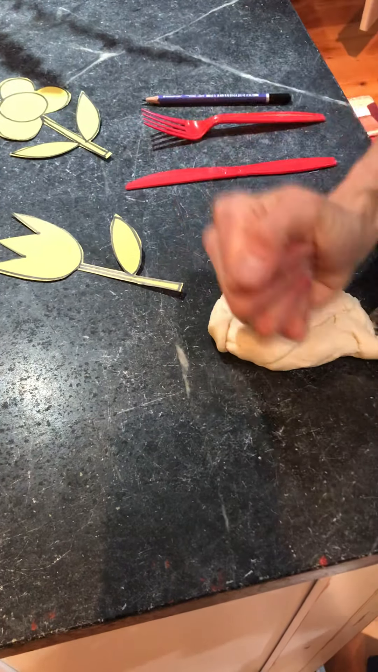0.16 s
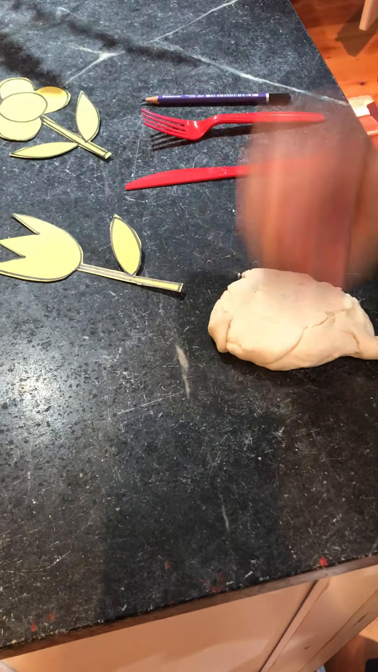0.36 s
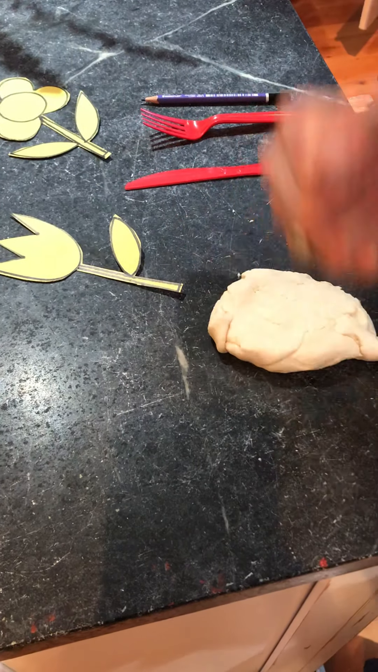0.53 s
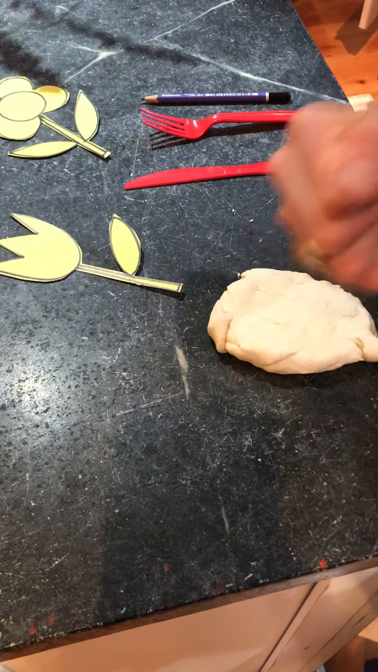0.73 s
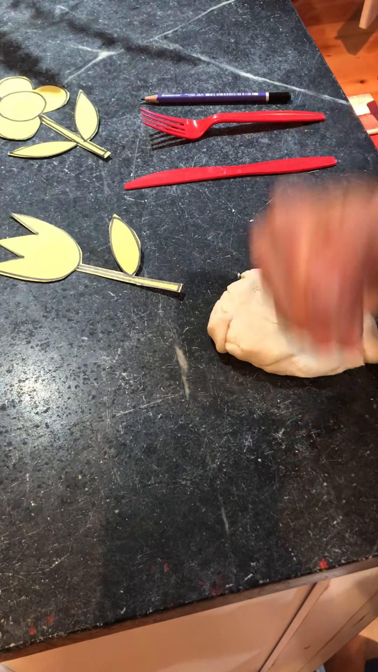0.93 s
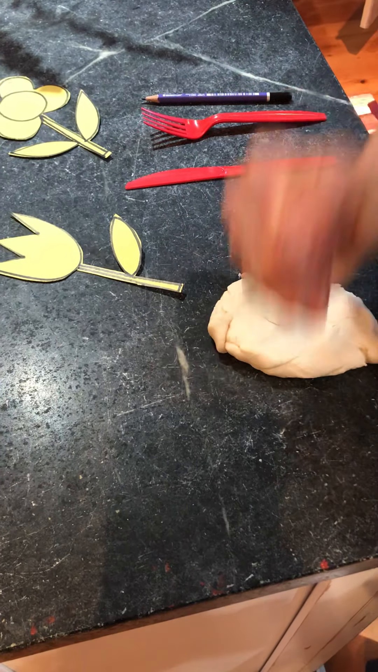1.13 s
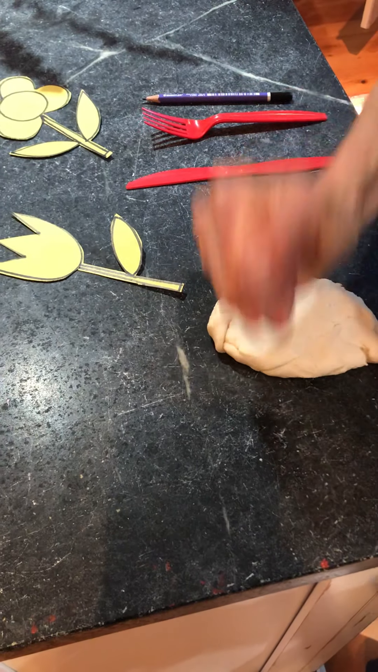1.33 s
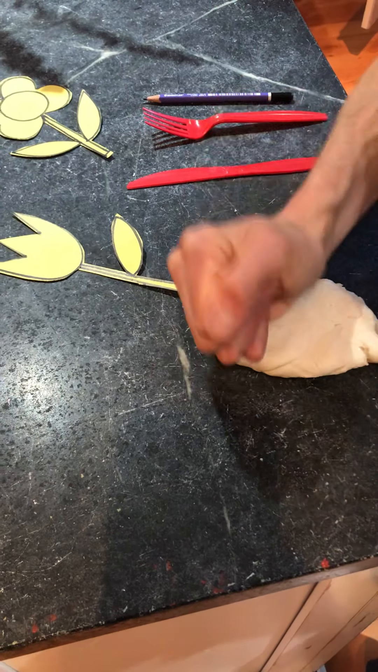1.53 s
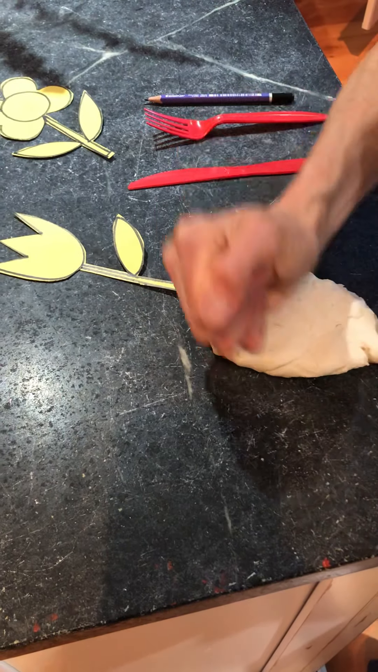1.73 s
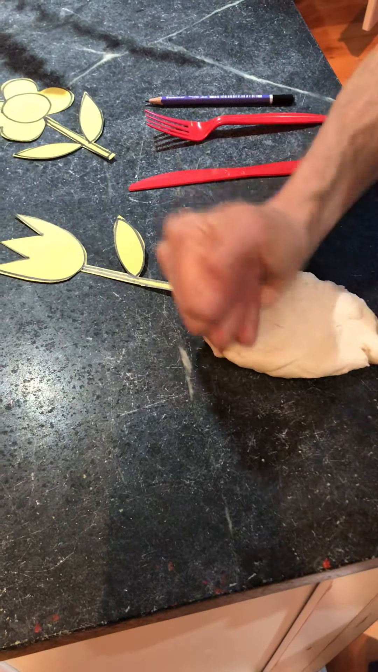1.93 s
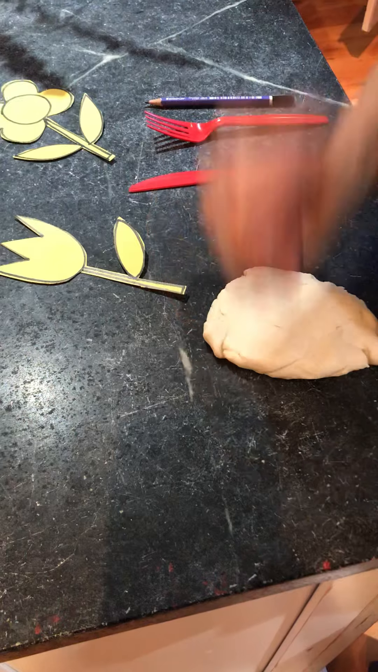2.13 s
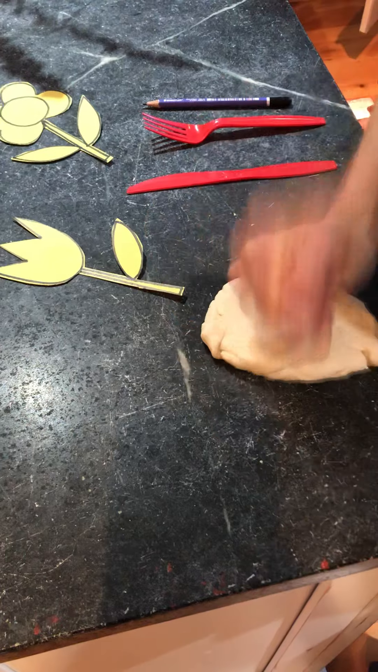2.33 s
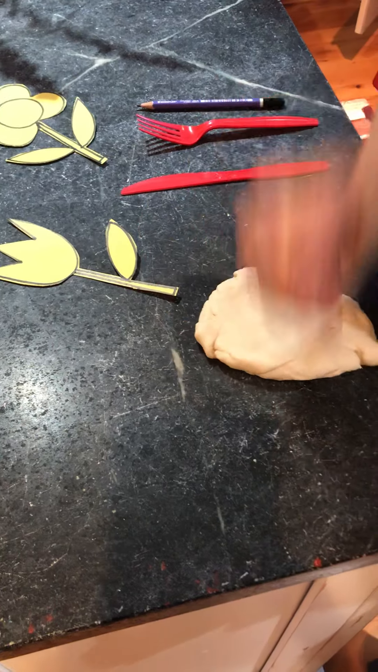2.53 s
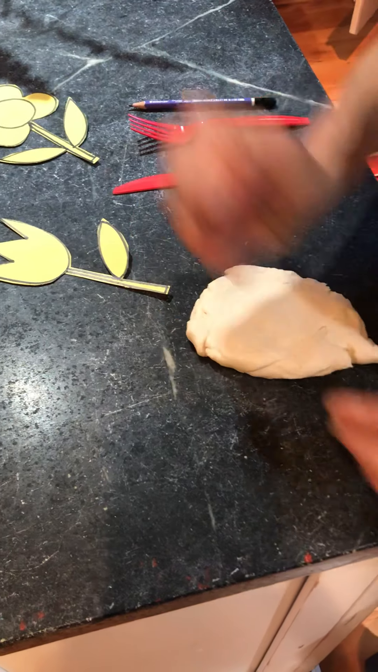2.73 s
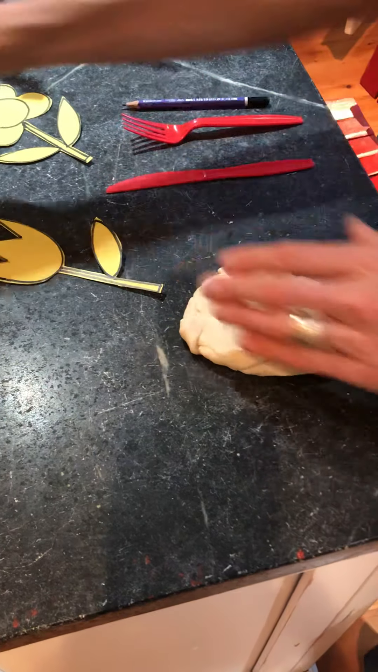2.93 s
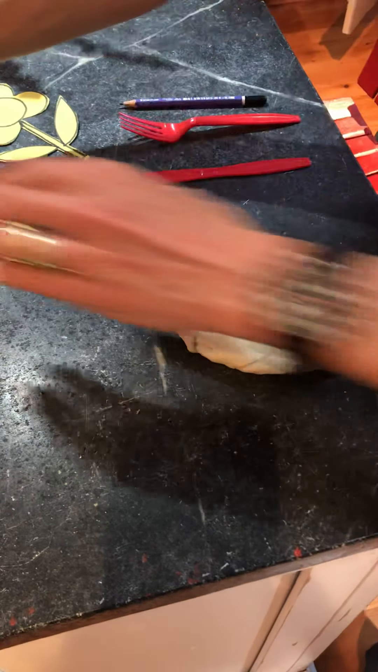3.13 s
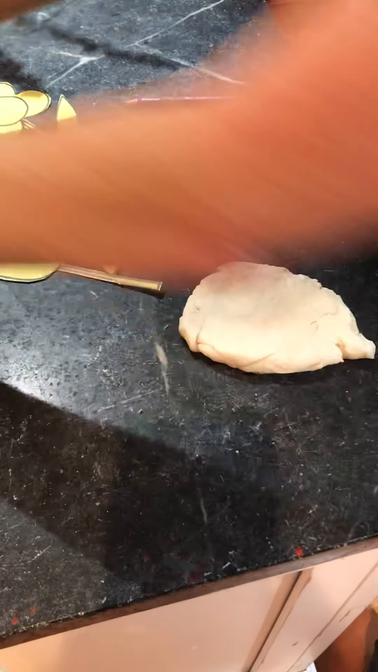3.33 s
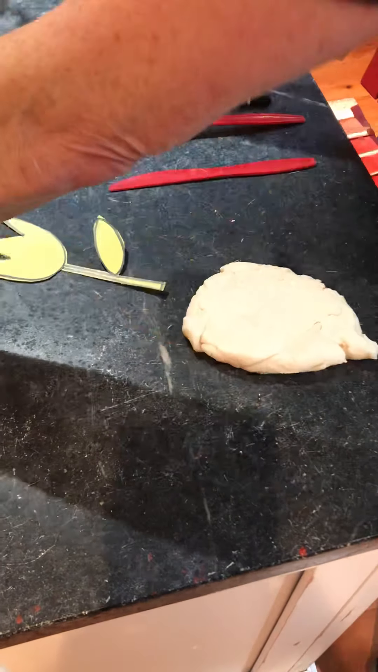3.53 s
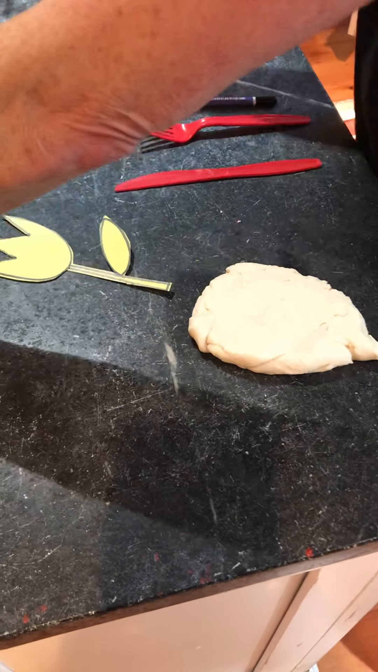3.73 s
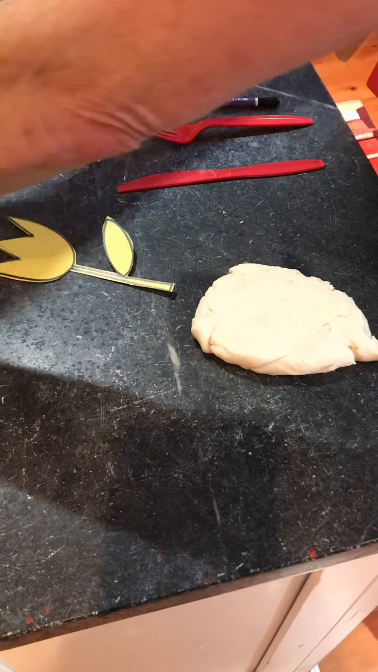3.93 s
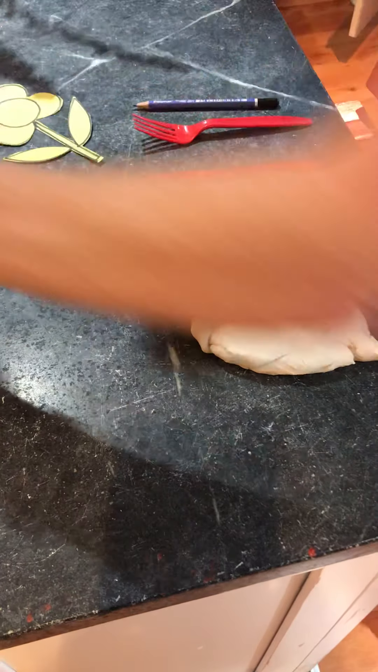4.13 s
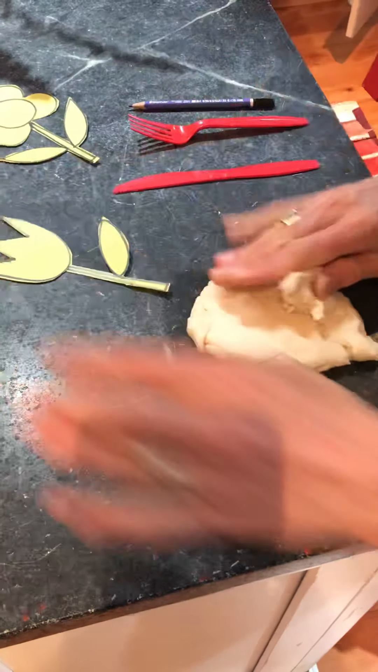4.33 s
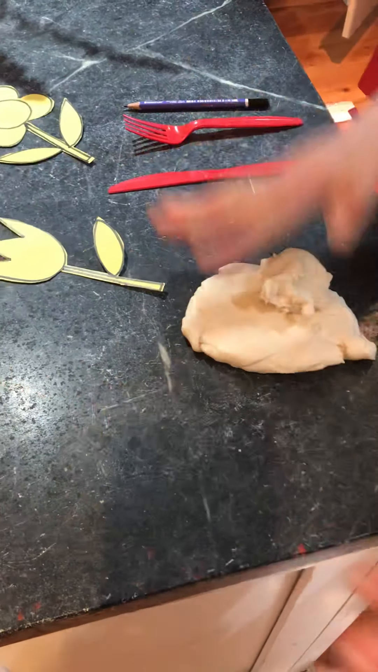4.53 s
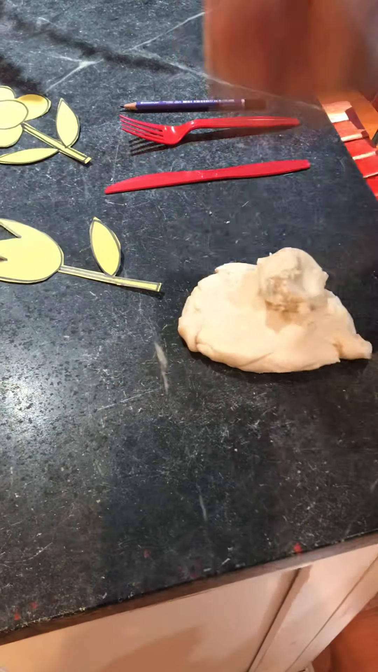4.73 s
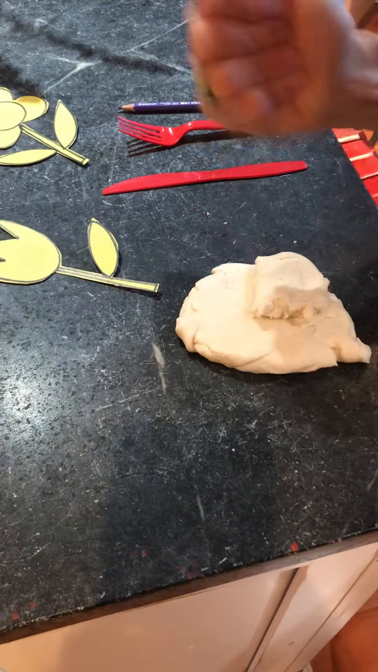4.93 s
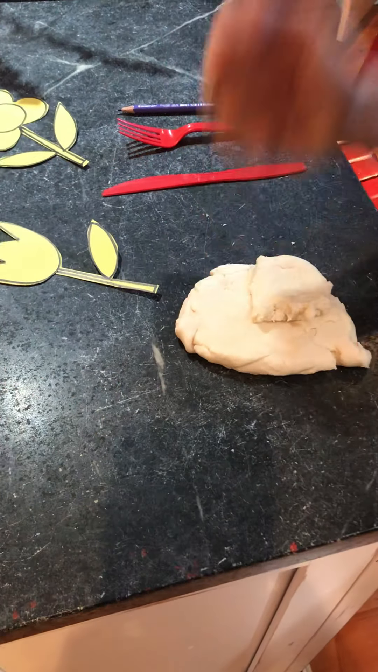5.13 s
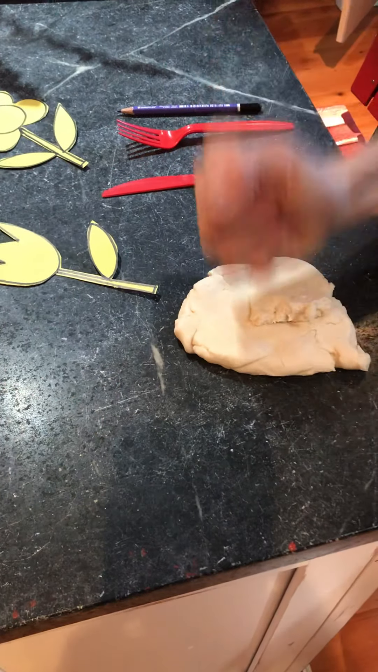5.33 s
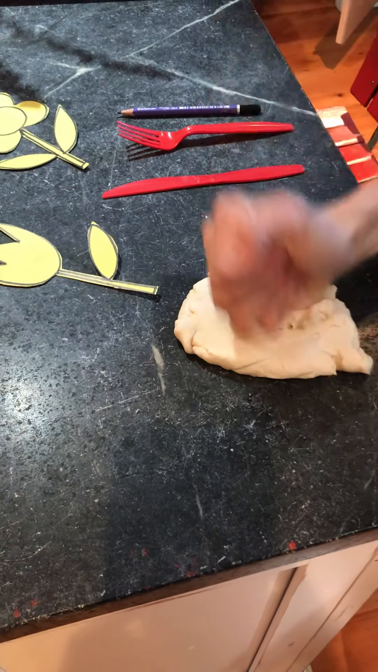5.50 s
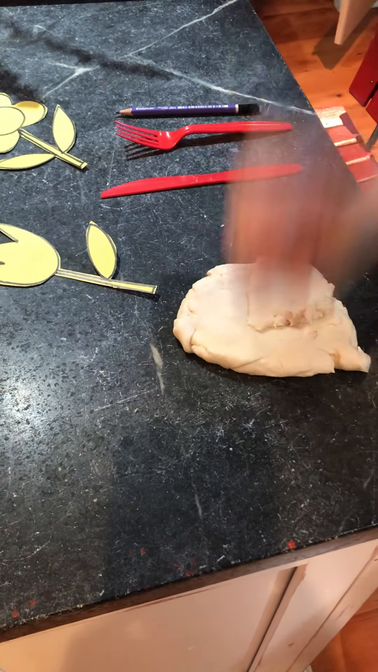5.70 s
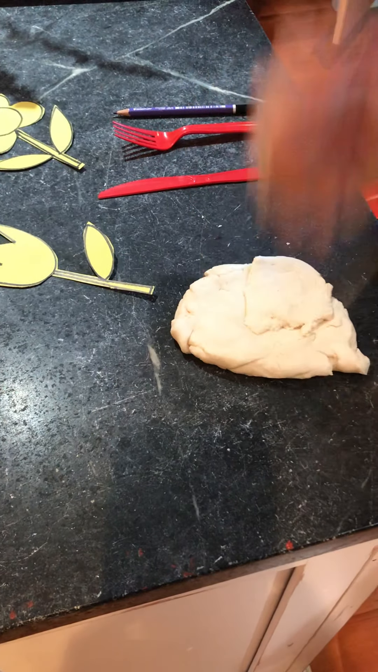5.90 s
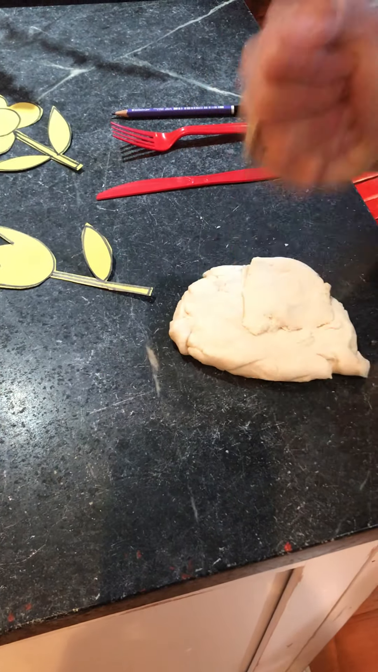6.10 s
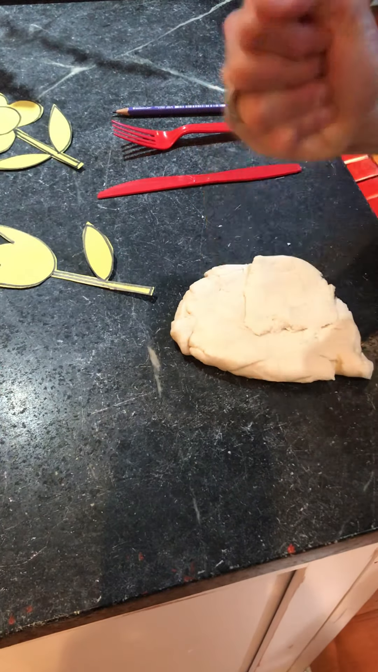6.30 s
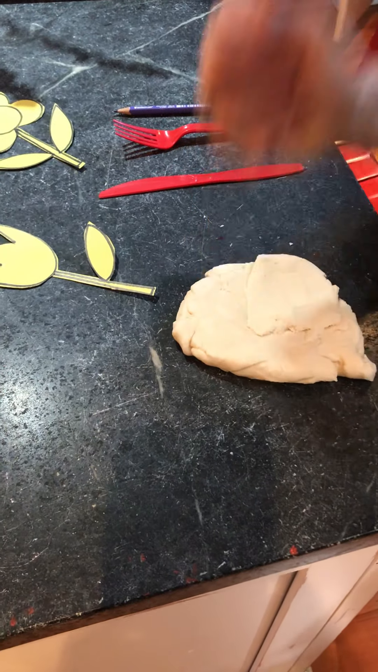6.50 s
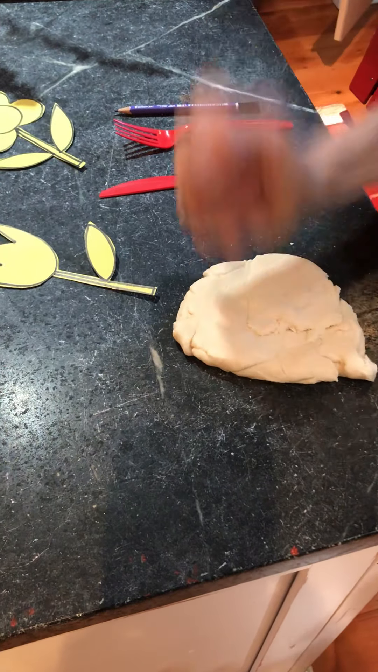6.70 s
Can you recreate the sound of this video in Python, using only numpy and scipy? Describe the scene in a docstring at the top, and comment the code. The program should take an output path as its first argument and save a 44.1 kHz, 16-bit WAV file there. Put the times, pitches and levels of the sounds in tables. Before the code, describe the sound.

In a small kitchen, a fist pats dough on a stone counter about four times a second: twelve soft thumps with a light skin smack and airy pop. A two-second pause holds only sleeve brushes, tiny ticks and refrigerator hum. A hollow knock opens the second run of ten, heavier and finally louder, with a cabinet door knocking faintly. Close microphone, short room tail.

```python
"""A fist pats a lump of dough flat on a stone counter, in two quick runs, in a small kitchen.
Each pat is noise gated by skin contact, a trapped-air tone of falling pitch and a deep thump of damped modes.
A hollow knock opens the second run, and a cabinet door knocks as shaped noise, more under heavier blows.
The hand ticks in short noise bursts, a sleeve brushes as swelling hiss, and a refrigerator hums in
wavering tones and filtered noise; a short diffuse tail and early echoes place the sounds in the room."""
import sys
import numpy as np
from scipy import signal
from scipy.fft import rfft, irfft, next_fast_len
from scipy.io import wavfile

SR = 44100
rng = np.random.default_rng(int(sys.argv[2]) if len(sys.argv) > 2 else 0)


def generate_wav(signal):
    """Clip the signal to [-1, 1] and save it as 16-bit WAV at the path in sys.argv[1]."""
    frames = np.transpose(np.atleast_2d(signal))
    scaled = np.clip(frames, -1, 1) * 32767
    pcm = np.round(scaled).astype(np.int16)
    wavfile.write(sys.argv[1], SR, pcm)


N = 302261

# The blows of the fist. Each row: slap time in seconds, weight in dB, hardness in dB, slap level in dB,
# sizzle in dB over the slap, tilt of the sizzle's top in dB, air pop level in dB, nominal air pop
# frequency in Hz, graze from 0 (square) to 1 (glancing). The levels are relative.
PAT_BLOWS = [(0.1473, -2.5, -4, -38, -7.5, -10, -42, 1230, 0.02),
             (0.379, -2.5, -2, -35.5, -3, 4, -37, 2010, 0.79),
             (0.603, -3, -0.5, -39.5, 2.5, 8, -39.5, 1850, 0.98),
             (0.8297, -2.5, 2, -38.5, 4.5, 4, -39, 1190, 0.72),
             (1.052, -2, 0.5, -41, 6, 9, -44, 1160, 0.83), (1.2739, -2.5, 2.5, -37.5, 0, 1, -36, 1040, .7),
             (1.4834, -2, 1, -41, 4.5, 0, -37, 1100, 0.07),
             (1.7036, -1.5, 4, -35, 5.5, -1.5, -27, 1160, .05),
             (1.9207, -1.5, 2.5, -40, 1.5, 0, -46, 1530, 0.56),
             (2.144, -1.5, 3.5, -40.5, 8.5, -5, -36.5, 1030, 0.07),
             (2.354, 0, 1, -39, -1.5, 0, -36.5, 1230, 0.04), (2.5705, -.5, 3.5, -44, 6, 5, -38, 1270, 0.87),
             (4.766, -3, -3.5, -49, 4, 10, -45, 1300, 0.9),
             (5.0089, 0, -3.5, -40, 2.5, 7, -38.5, 1140, 0.1),
             (5.2502, 1.5, 1, -36.5, 7.5, 12, -29.5, 1140, 0.14),
             (5.4996, 3, -3.5, -34.5, 3, 4.5, -34.5, 1120, 0.68),
             (5.736, -.5, -3, -39.5, -1, -6, -44, 1000, 0.46),
             (5.9632, 0, 2.5, -34.5, -1.5, 11, -30, 1190, 0.68),
             (6.176, 1.5, 1, -34, 4, -8, -35, 1140, .05), (6.3905, 0, 7.5, -31.5, 0.5, 0, -28.5, 1210, .15),
             (6.619, 1, 5, -32.5, 7.5, -4, -33.5, 1130, 0.35), (6.8497, 2, 1, -23.5, 6, -7, -28, 1550, .1)]
# Time from first touch to slap: for a square blow in seconds, for a grazing one in seconds.
TOUCH_LEAD = (.0012, .0032)


def gain_of(db):
    """Decibels to amplitude."""
    return 10 ** (np.asarray(db) / 20)


def evened(x):
    """Scales to rms 1."""
    return x / np.sqrt(np.mean(x ** 2) + 1e-20)


def read(points, hz):
    """Joins (Hz, value) points on a log-frequency axis."""
    f, value = np.transpose(points)
    return np.interp(np.log(hz + 1), np.log(f + 1), value)


def add(mix, s, sound):
    """Mixes a sound in at time s."""
    part = mix[max(round(s * SR), 0):][:len(sound)]
    part += sound[:len(part)]


def colour(x, points, size=2048):
    """Causal filter with the given spectrum, so that attacks stay sharp."""
    log_gain = np.log(gain_of(read(points, abs(np.fft.fftfreq(size, 1 / SR)))))
    taps = np.fft.ifft(np.exp(np.conj(signal.hilbert(log_gain)))).real
    return signal.fftconvolve(x, taps[:size // 2])[:len(x)]


def noise(magnitude):
    """Steady noise of rms 1 whose spectrum is magnitude(Hz)."""
    size = next_fast_len(N)
    return evened(irfft(rfft(rng.standard_normal(size)) * magnitude(np.fft.rfftfreq(size, 1 / SR)), size)[:N])


def drift(rate_hz):
    """Slow chance of rms 1."""
    return noise(lambda hz: 1 / (1 + (hz / rate_hz) ** 4))


def kitchen(rumble_db=-49.5, waver_rad=0.48, tremor_db=2.0, air_db=-62, whine_hz=1138, whine_lift_db=1.04):
    """Superposition: slowly modulated tones and resonant noise of the refrigerator over broadband air noise."""
    # Spectrum of the kitchen at rest. Each row: frequency in Hz, relative density in dB.
    air_spectrum = [(760, -21), (1300, -1.5), (1970, -5), (2700, -7), (4020, -12.5), (6570, -15.5),
                    (7520, -20.5), (8890, -17.5), (10500, -22.5), (12800, -16.5), (15800, -23)]
    # Spectrum of the refrigerator's rumble. Each row: frequency in Hz, relative density in dB.
    rumble_spectrum = [(22, -26), (36, -13), (52, -9), (64, 0.5), (103, 1.5), (140, -10.5), (180, -5),
                       (240, -9.5), (330, -12), (420, -17.5), (620, -17), (780, -18), (950, -15),
                       (1400, -26)]
    # Low tones of the refrigerator. Each row: frequency in Hz, rms level in dB before the tremor.
    hum_tones = [(51.5, -59), (120, -52.5), (172.3, -63.5)]
    # Resonances of its fan and housing. Each row: centre in Hz, half-width in Hz, rms level in dB.
    fan_modes = [(554.3, 13.6, -65.5), (607, 19, -60), (694.6, 44, -59.5), (917, 11, -69.5),
                 (984, 7.4, -74.5), (1431, 13, -74)]
    # Course of its thin whine. Each row: time in seconds, level in dB before the lift and the tremor.
    whine_course = [(0.0, -65), (0.98, -62.5), (3.11, -69.5), (3.45, -62), (5.02, -67.5), (5.77, -63.5),
                    (6.8, -64.5)]
    t = np.arange(N) / SR
    out = gain_of(air_db) * noise(lambda hz: gain_of(read(air_spectrum, hz)))
    out += gain_of(rumble_db) * noise(lambda hz: gain_of(read(rumble_spectrum, hz)) / (1 + (hz / 1500) ** 8))
    whine_db = whine_lift_db + np.interp(t, *np.transpose(whine_course))
    for tone_hz, db in hum_tones + [(whine_hz, whine_db)]:
        level = gain_of(db + tremor_db * drift(1.7))
        phase = 2 * np.pi * tone_hz * t + waver_rad * drift(3.0)
        out += level * np.sqrt(2) * np.sin(phase)
    for centre_hz, width, db in fan_modes:
        out += gain_of(db) * noise(lambda hz: 1 / (1 + ((hz - centre_hz) / width) ** 2))
    return out


def room(x, tail_db=-8, build=0.0056):
    """Diffuse reverberation: noise that decays exponentially in each band, the top of the treble fastest."""
    # The kitchen's ring. Each row: frequency in Hz, t60 in seconds, relative level in dB.
    ring_bands = [(300, 0.75, 3.5), (1210, 0.24, -3.5), (2250, 0.28, -3.5), (3900, 0.25, -1.5),
                  (8100, 0.21, -5.5), (15000, 0.14, 0.5)]
    hz, t, z = signal.stft(rng.standard_normal(SR // 2), SR, nperseg=256)
    t60, db = (read(np.array(ring_bands)[:, [0, k]], hz)[:, None] for k in (1, 2))
    tail = signal.istft(z * gain_of(db - 60 * t / t60), SR, nperseg=256)[1]
    tail *= 1 - np.exp(-(np.arange(len(tail)) / SR / build) ** 2)
    return signal.fftconvolve(x, tail * gain_of(tail_db) / np.linalg.norm(tail))


def echoed(x):
    """Specular reflection: the direct sound, then delayed and weaker copies."""
    # Early echoes from cupboards and walls. Each row: delay in seconds, level in dB.
    reflections = [(0.01, -21), (.0132, -48), (0.0156, -25)]
    impulses = np.zeros(SR // 32)
    for s, db in [(0.00037, 0.02)] + reflections:  # the direct sound comes first
        add(impulses, s, gain_of([db]))
    return signal.fftconvolve(x, impulses)


def brushes(octaves=0.96, grains_per_s=600, grain_db=-7.5):
    """Sliding friction: cloth and skin hiss, roughened by random small catches of the fibres."""
    # Moves of sleeve and arm, and one very short hiss as the hand first touches before the second run. Each
    # row: time of the peak in seconds, swell time in seconds, # hiss level in dB before the catches, centre in
    # Hz.
    moves = [(.07, 0.052, -62, 4140), (.133, 0.0032, -45.5, 6900), (2.92, 0.014, -55.5, 14000),
             (3.36, 0.1, -62.5, 12500), (3.45, .02, -48, 11000), (3.695, .04, -59.5, 11000),
             (3.752, 0.019, -53, 7060), (3.957, 0.0098, -55, 7000), (4.2, 0.4, -71.5, 11000),
             (4.323, .012, -56.5, 12000), (4.7599, .001, -44.5, 4000), (4.926, 0.0088, -57, 13000)]
    out, t = np.zeros(N), np.arange(N) / SR
    catches = (rng.random(N) < grains_per_s / SR) * rng.exponential(1, N)
    grains = evened(signal.lfilter([1], [1, -np.exp(-1 / (0.0009 * SR))], catches))
    for s, swell, db, centre_hz in moves:
        stroke = np.exp(-.5 * ((t - s) / swell) ** 2)
        hiss = noise(lambda hz: np.exp(-.5 * (np.log2((hz + 1) / centre_hz) / octaves) ** 2))
        out += gain_of(db) * stroke * hiss
    return out * (.5 + gain_of(grain_db) * grains)


def ticks(level_db=-18, scatter_db=4.5, decay=0.0019, ring_hz=13800, ring_db=-16, ring_t60=.05):
    """Impulsive excitation: tiny bright noise bursts of the hand and arm, with a thin ring of random strength."""
    # Ticks in every stroke, as the hand swings down and as it lifts off. Each row: offset from the slap
    # in seconds, scatter in seconds, relative level in dB.
    stroke_ticks = [(-.063, 0.011, -54), (.074, .004, -52.5)]
    # Ticks outside that rhythm. Each row: time in seconds, relative level in dB.
    lone_ticks = [(0.1282, -38), (2.9607, -50), (3.437, -40), (3.476, -46), (3.7554, -51), (3.9524, -54),
                  (4.371, -50)]
    out, t = np.zeros(N), np.arange(SR // 32) / SR
    events = list(lone_ticks)
    for s, *_ in PAT_BLOWS:
        for offset, scatter, db in stroke_ticks:
            tick_s = s + offset + scatter * rng.standard_normal()
            events.append((tick_s, db + scatter_db * rng.standard_normal()))
    spectrum = [(2000, -5.0), (6000, -9), (9000, 1), (13500, -4), (16000, -13)]  # (Hz, dB)
    for s, db in events:
        snap = colour(rng.standard_normal(len(t)) * np.exp(-t / decay), spectrum)
        tone = evened(np.sin(2 * np.pi * ring_hz * t) * gain_of(-60 * t / ring_t60))
        ring = rng.random() * gain_of(ring_db) * tone
        add(out, s, gain_of(db + level_db) * (evened(snap) + 2 * ring))
    return out


def door(level_db=-51, peak=0.034, rise_with_weight=1.8):
    """Sympathetic shaking: a cabinet door's noise swells to a peak after the blow, more under heavier ones."""
    # Spectrum of the door's knock. Each row: frequency in Hz, relative density in dB.
    knock_spectrum = [(400, -39.5), (530, -5), (595, 4), (640, 2.5), (700, 1), (780, -17), (1000, -40)]
    out, t = np.zeros(N), np.arange(SR // 3) / SR
    for s, weight_db, *_ in PAT_BLOWS:
        swell = t / peak * np.exp(1 - t / peak)
        shake = swell * evened(colour(rng.standard_normal(len(t)), knock_spectrum))
        add(out, s, gain_of(level_db + rise_with_weight * weight_db) * shake)
    return out


def lump(start_s=4.7635, sag=.25, rise=.003):
    """Damped resonance: a loose ball of dough laid on top knocks hollowly, and its pitch sinks as it flattens."""
    # The ball's knock: nominal frequency in Hz, level in dB, t60 in seconds.
    knock = (276, -37, 0.23)
    out, t = np.zeros(N), np.arange(SR // 5) / SR
    hz, db, t60 = knock
    pitch = hz * (1 + sag * (gain_of(-60 * t / t60) - .5))
    turns = np.cumsum(pitch) / SR
    envelope = gain_of(db - 60 * t / t60) * (1 - np.exp(-t / rise))
    add(out, start_s, envelope * np.sin(2 * np.pi * turns))
    return out


def grazing(ends, graze):
    """Linear interpolation: blends a (square, grazing) pair by how glancing the blow is."""
    return np.interp(graze, [0, 1], ends)


def thumps(swell=0.0081, hard_hz=165, spread=0.0075, rattle_db=-47, rattle_rise=0.018, rattle_t60=0.81,
           dough_db=-26.0, dough_decay=0.01, squash_db_per_db=0.24):
    """Modal synthesis: the dough cushions the blow, so modes swell slowly; hard blows favour the upper ones."""
    # Modes of counter and cabinet. Each row: nominal frequency in Hz, relative level in dB, t60 in seconds,
    # time the blow takes to reach the mode in seconds.
    counter_modes = [(39.05, -35, 0.84, 0.023), (50.7, -25, 0.3, 0.012), (59.3, -26.5, 0.44, 0.0029),
                     (100.7, -30, 0.52, 0.0033), (112, -32, 0.41, 0.02375), (138.65, -33.5, 0.39, 0.0063),
                     (172.5, -14.5, 0.071, 0.0257), (180.86, -31, 0.27, 0.0125),
                     (217.6, -25.5, 0.08, 0.0164)]
    # Cabinet doors and things on the counter, shaken by the thump. Each row: frequency in Hz,
    # relative density in dB.
    rattle_spectrum = [(120, -27), (230, 4.5), (310, 3.5), (420, -7.5), (620, -8.5), (700, -6),
                       (820, -10.5), (1300, -13.5), (3000, -49)]
    # The dough being squashed. Each row: frequency in Hz, relative density in dB.
    squash_spectrum = [(100, -14), (200, 8), (290, -3.5), (450, -11.5), (700, -7), (1500, -29)]
    out, t = np.zeros(N), np.arange(SR // 2) / SR
    hz, db, t60, lag = np.transpose(counter_modes)[:, :, None]
    u = np.maximum(t - lag, 0)
    onset = 1 - np.exp(-(u / swell) ** 2)
    upper = np.minimum(hz / hard_hz, 1) ** 2
    shaken = gain_of(rattle_db - 60 * t / rattle_t60) * (1 - np.exp(-(t / rattle_rise) ** 2))
    squashed = gain_of(dough_db) * (1 - np.exp(-t / 0.0032)) * np.exp(-t / dough_decay)
    for s, weight_db, hard_db, slap_db, *_, graze in PAT_BLOWS:
        detune = 1 + spread * rng.standard_normal(hz.shape)  # the fist lands on a new spot each time
        level = gain_of(db + hard_db * upper - 60 * u / t60)
        ring = level * onset * np.sin(2 * np.pi * hz * detune * u)
        rattle = gain_of(.5 * hard_db) * shaken * evened(colour(rng.standard_normal(len(t)), rattle_spectrum))
        squash = squashed * evened(colour(rng.standard_normal(len(t)), squash_spectrum))
        dough = gain_of(squash_db_per_db * slap_db) * squash  # a louder slap squashes the dough more
        thump = gain_of(weight_db) * (rattle - ring.sum(0))  # minus: the top moves down first
        add(out, s - grazing(TOUCH_LEAD, graze), dough + thump)
    return out


def contact(t, lead, touch_db, late, snap=0.00016, fingers_db=-5, squeeze=0.0019, squeeze_db=-10):
    """Contact excitation: skin rubs the dough, snaps shut on it, and the fingers close just after."""
    u = t - lead
    palm = (u >= 0) * np.exp(-abs(u) / snap)
    fingers = (u >= late) * gain_of(fingers_db) * np.exp(-abs(u - late) / snap)
    rubbing = np.where(u < 0, gain_of(touch_db), gain_of(squeeze_db) * np.exp(-abs(u) / squeeze))
    return np.sqrt(palm ** 2 + fingers ** 2 + rubbing ** 2) * rng.standard_normal(len(t))


def skin(drive, bright_db, top_db, slap_db=-10, sizzle_db=-10):
    """Source and filter: skin on dough gives a mid crack and a sizzle whose top varies with the grip."""
    # Lower part of the skin's sound. Each row: frequency in Hz, relative density in dB.
    crack_spectrum = [(500, -30), (1500, 2), (2400, 3.5), (3200, 3.5), (4600, 3), (6300, -2), (8500, -13.5),
                      (16000, -44)]
    # Upper part of the skin's sound. Each row: frequency in Hz, relative density in dB.
    sizzle_spectrum = [(3000, -55.5), (5800, -3.5), (7500, -0.5), (9000, 1.5), (10700, -2), (13000, -1),
                       (16000, -6)]
    sizzle = colour(colour(drive, sizzle_spectrum), [(8500, 0), (12500, top_db)])
    crack = evened(colour(drive, crack_spectrum))
    return gain_of(slap_db) * crack + gain_of(sizzle_db + bright_db) * evened(sizzle)


def air_pocket(u, hz, t60=0.012, sag=0.59, sag_time=0.0039):
    """Cavity resonance: trapped air rings briefly; its opening closes, so the note falls."""
    pitch = hz * (1.15 - sag * (1 - np.exp(-u / sag_time)))
    turns = np.cumsum(pitch * (u > 0)) / SR
    return evened(np.sin(2 * np.pi * turns) * gain_of(-60 * u / t60))


def slaps(pop_db=-10, pop_rough=1.25, pop_room_db=-3):
    """Impact and cavity: a crack of skin with a short pop of air squeezed from under the fist."""
    # First touch, relative to the slap: for a square blow in dB, for a grazing one in dB.
    touch_levels = (-31.5, -8)
    # Delay of the fingers after the palm: soonest in seconds, latest in seconds.
    finger_delay = (0.00052, .0027)
    # The air that the dough spits out. Each row: frequency in Hz, relative density in dB.
    puff_spectrum = [(200, -9.5), (700, -3.5), (1150, 2), (2100, -3.5), (3500, -15.5), (9000, -39)]
    out, t = np.zeros(N), np.arange(SR // 32) / SR
    click = 1. * (t == 0)
    for s, _, _, level_db, bright_db, top_db, air_db, air_hz, graze in PAT_BLOWS:
        # a grazing fist touches sooner and rubs louder than one that lands square
        lead, touch_db = grazing(TOUCH_LEAD, graze), grazing(touch_levels, graze)
        late = np.interp(rng.random(), [0, 1], finger_delay)
        drive = contact(t, lead, touch_db, late)
        puff = evened(colour(drive, puff_spectrum))
        pop = evened(air_pocket(np.maximum(t - lead, 0), air_hz) + pop_rough * puff)
        crack = gain_of(level_db) * skin(drive, bright_db, top_db)
        add(out, s - lead, echoed(crack + gain_of(air_db + pop_db) * pop))
        # the room gathers the slap from all directions, so it rings with the even spectrum of a plain click
        add(out, s, gain_of(level_db) * room(skin(click, bright_db, .5 * top_db)))
        add(out, s, gain_of(air_db + pop_db + pop_room_db) * room(evened(colour(click, puff_spectrum))))
    return out


def scene():
    """Linear superposition: pats, small hand sounds and the kitchen add up at one microphone."""
    small = ticks() + brushes()
    surroundings = kitchen() + small + room(small)[:N]
    return (surroundings + door() + lump() + thumps() + slaps())[None]


def record(dry, edge_hz=16000):
    """Band limiting: a linear-phase low-pass filter sets the recorder's upper edge."""
    low_pass = signal.firwin(255, edge_hz, window=("kaiser", 9), fs=SR)
    return signal.oaconvolve(dry, low_pass[None], "same")


dry = scene()
out = record(dry)
generate_wav(out)
```